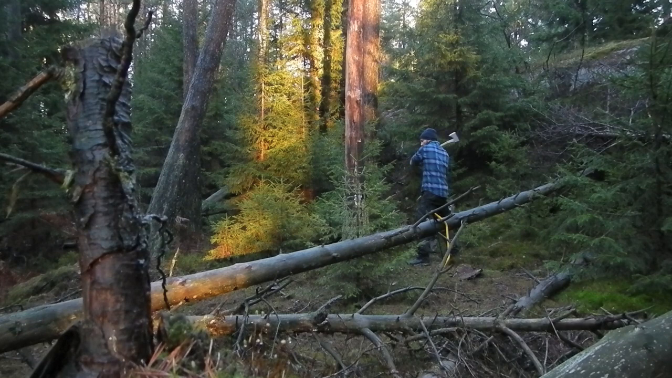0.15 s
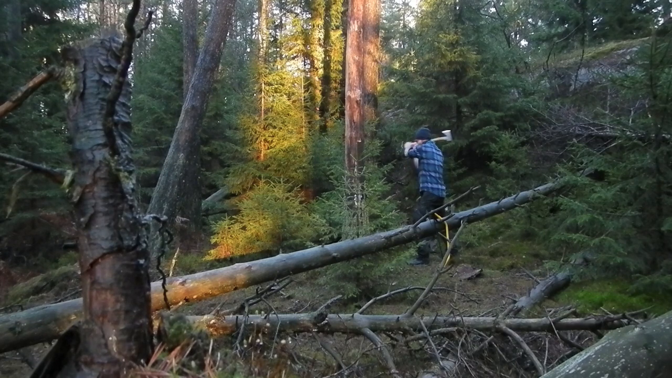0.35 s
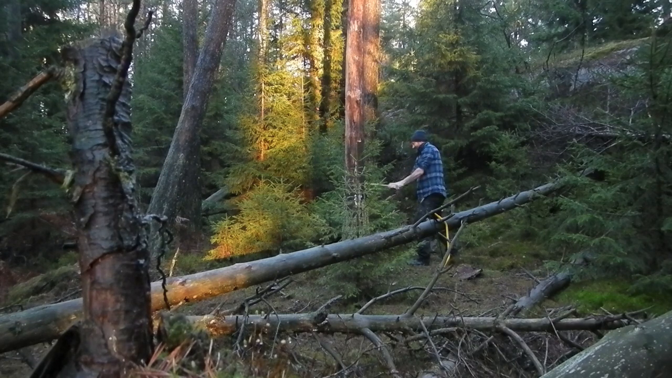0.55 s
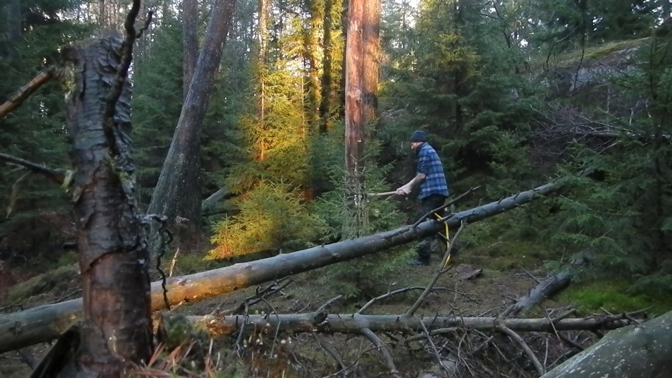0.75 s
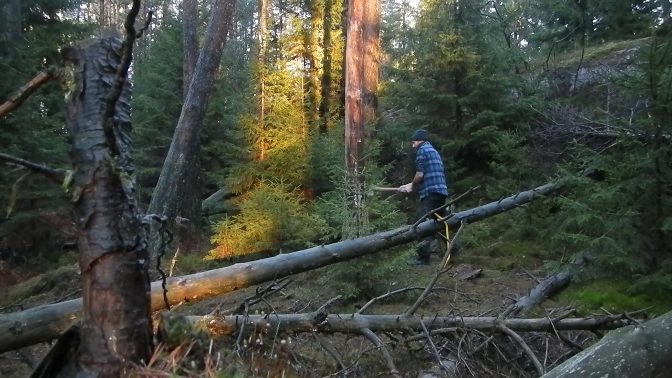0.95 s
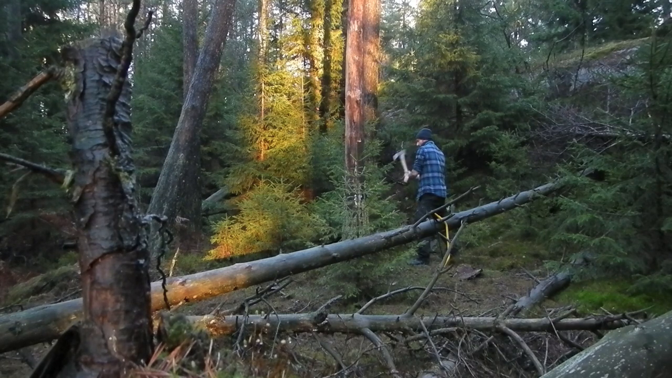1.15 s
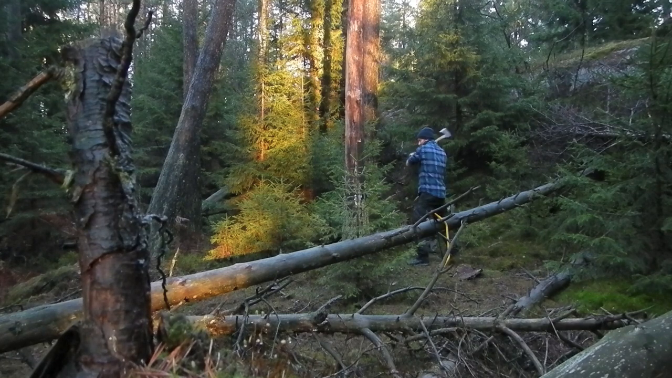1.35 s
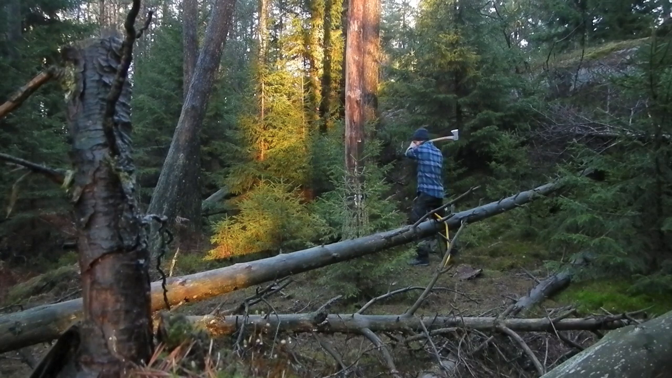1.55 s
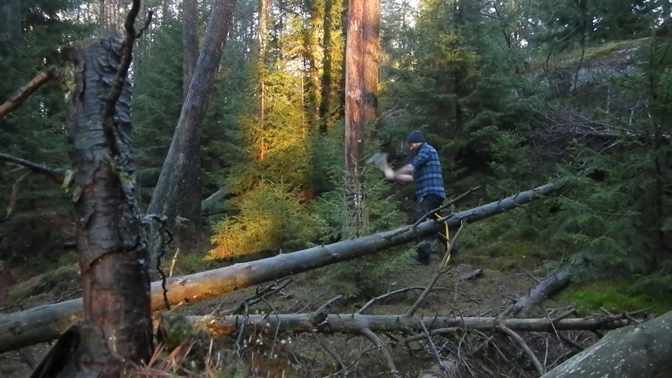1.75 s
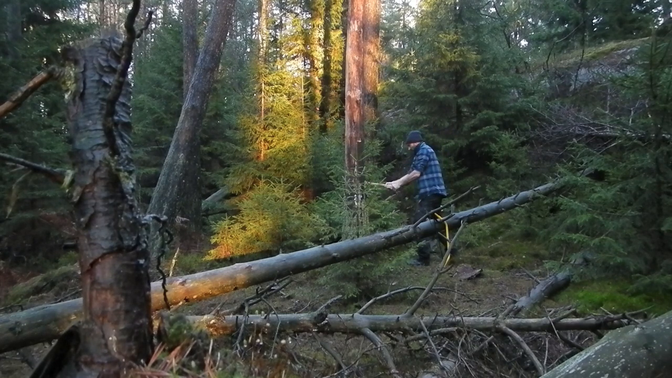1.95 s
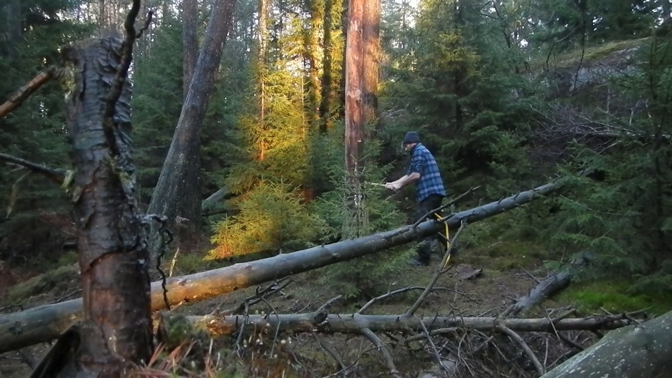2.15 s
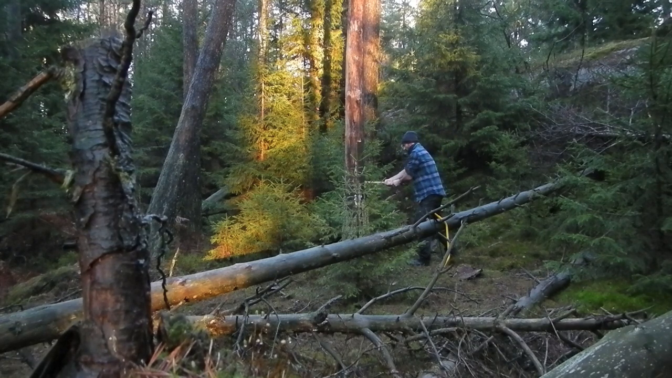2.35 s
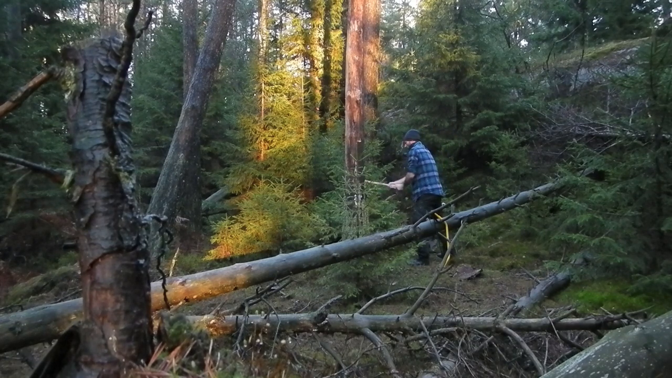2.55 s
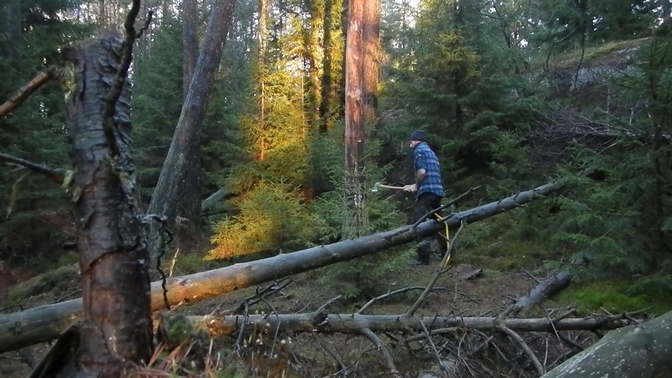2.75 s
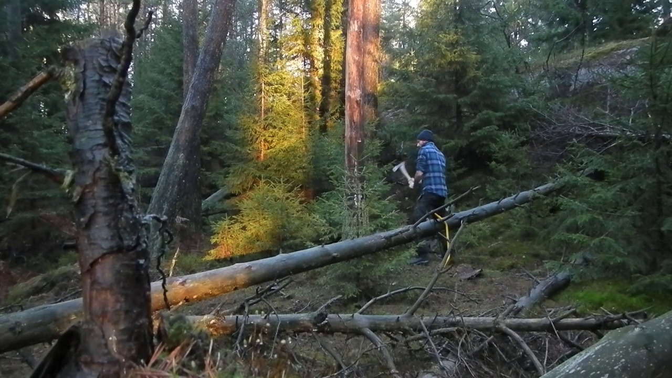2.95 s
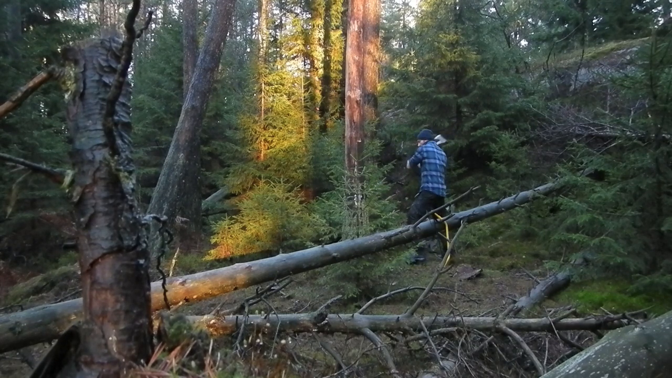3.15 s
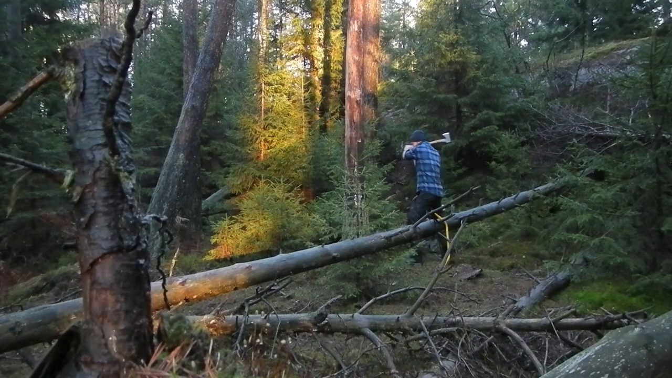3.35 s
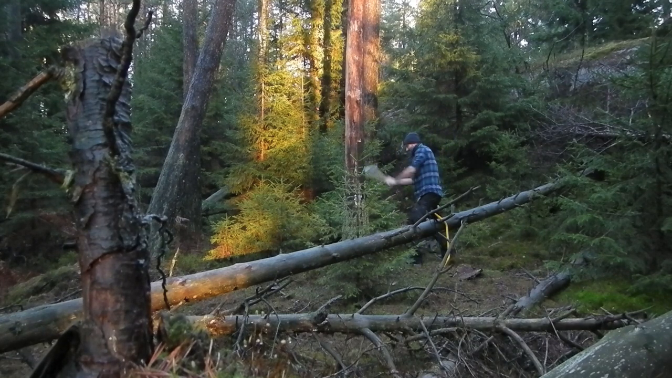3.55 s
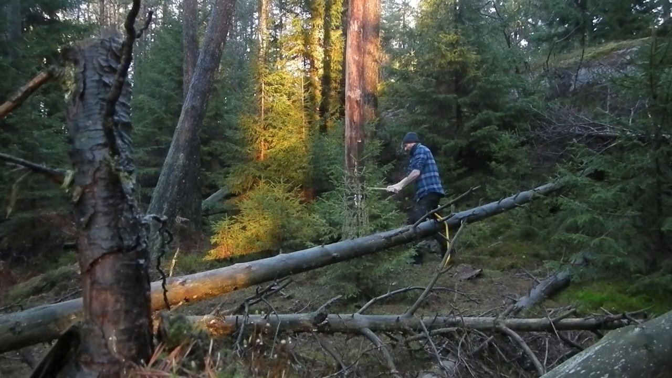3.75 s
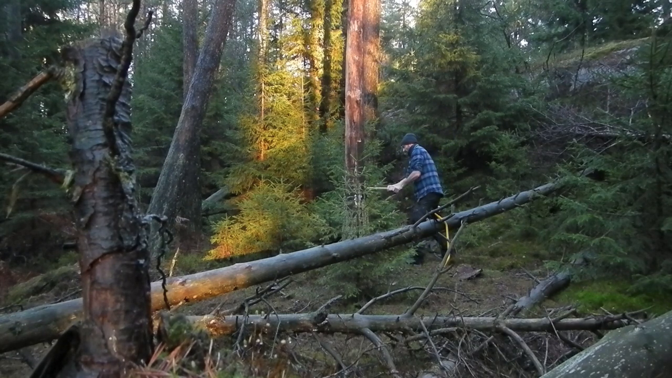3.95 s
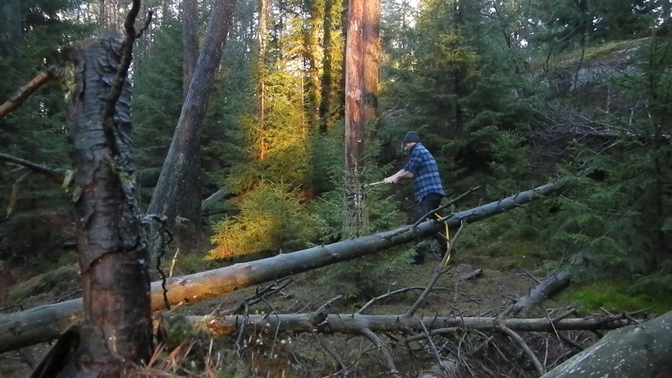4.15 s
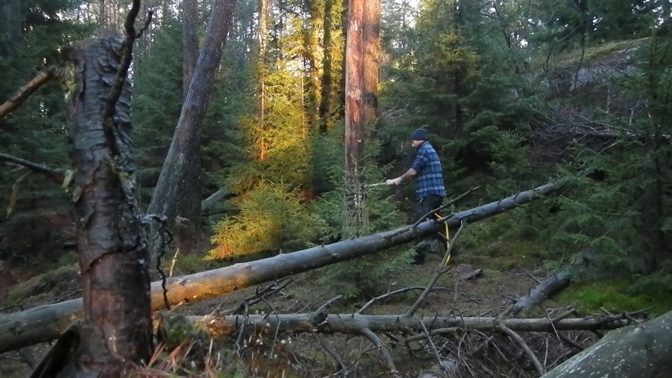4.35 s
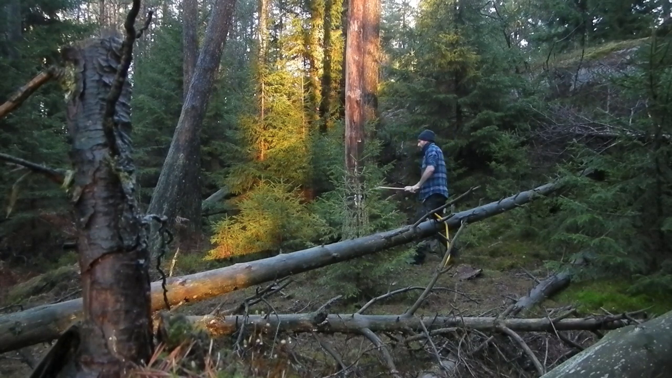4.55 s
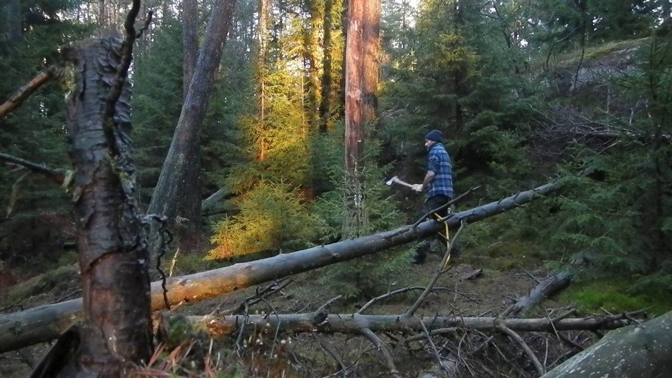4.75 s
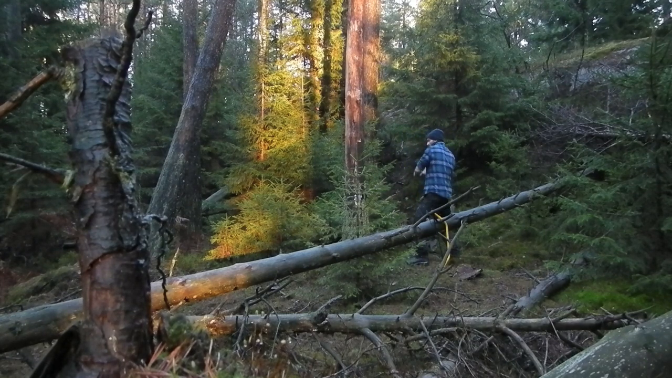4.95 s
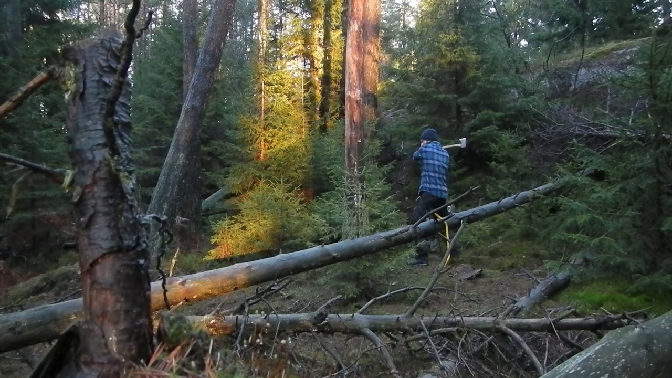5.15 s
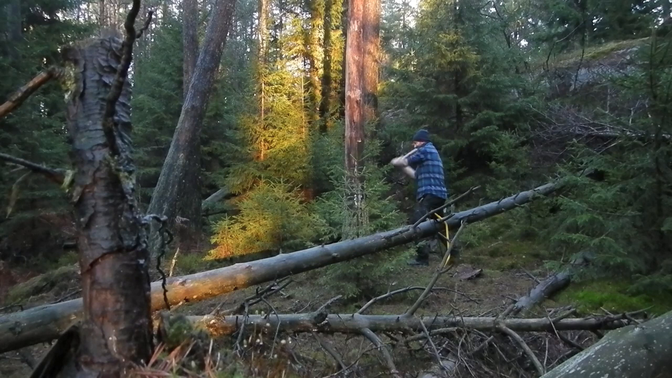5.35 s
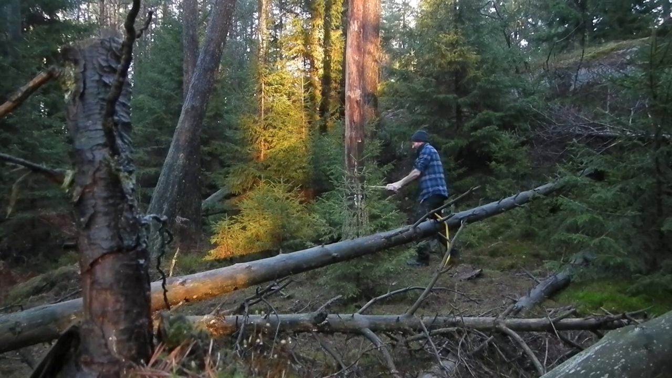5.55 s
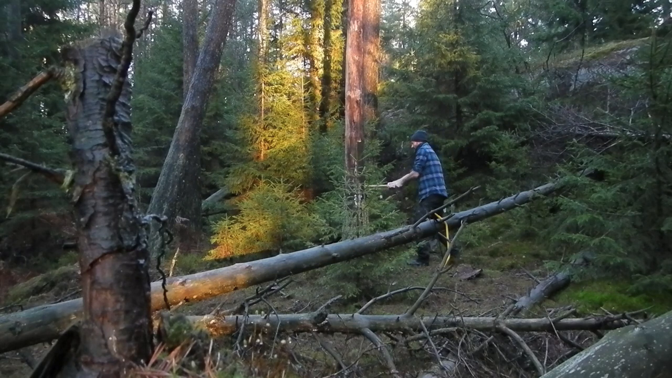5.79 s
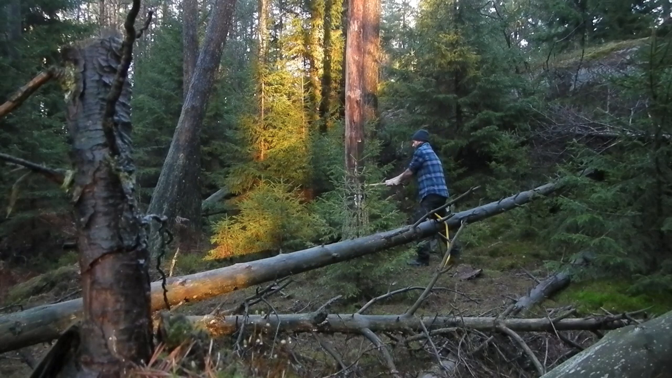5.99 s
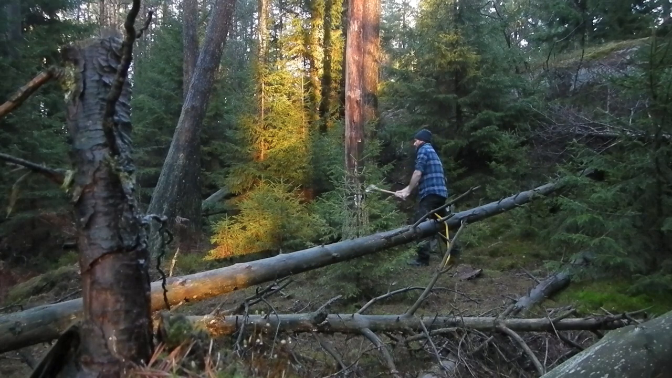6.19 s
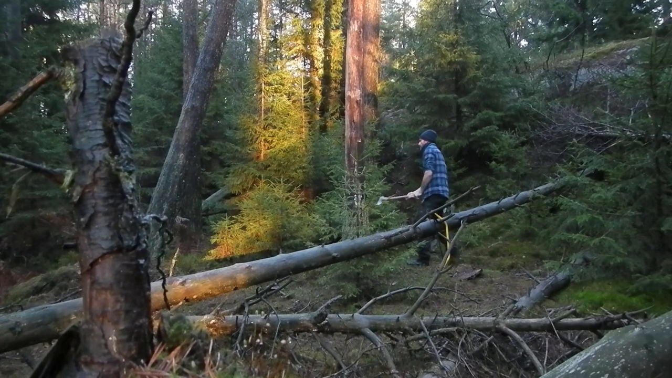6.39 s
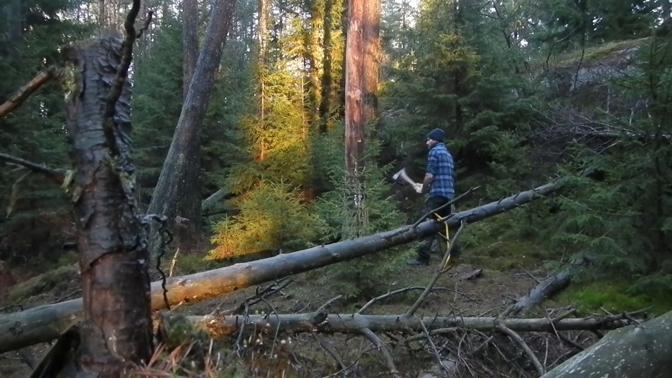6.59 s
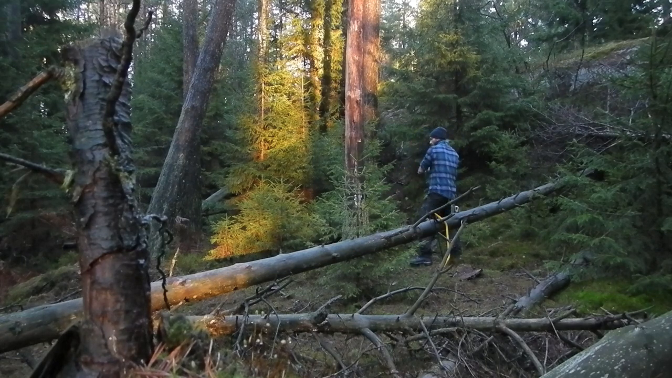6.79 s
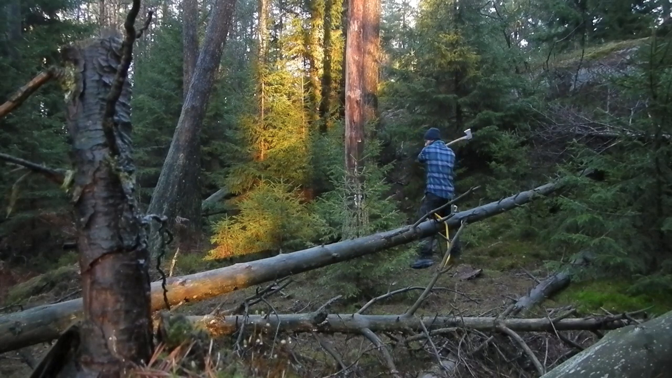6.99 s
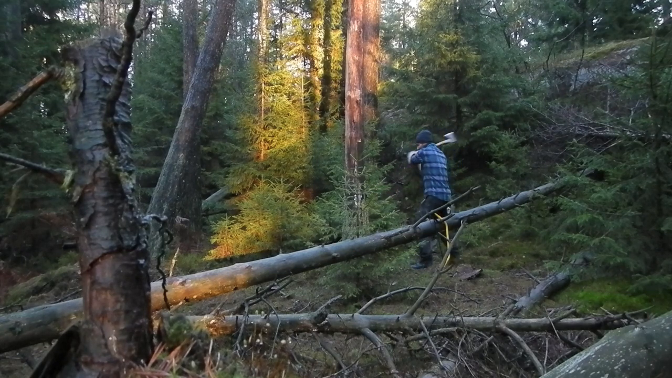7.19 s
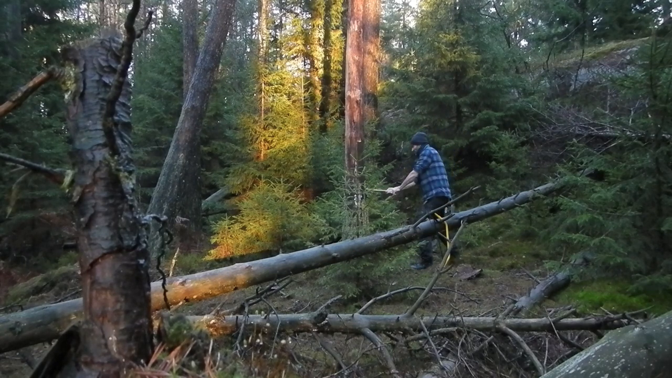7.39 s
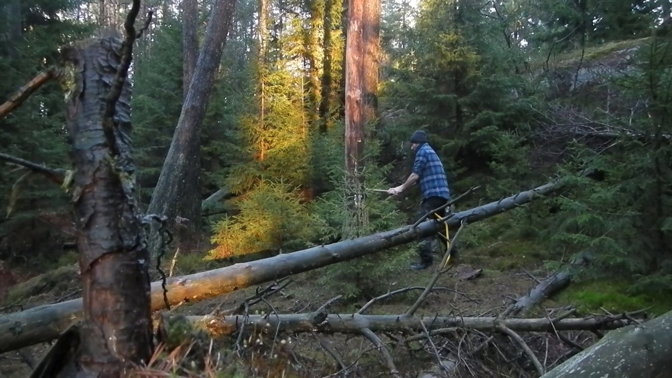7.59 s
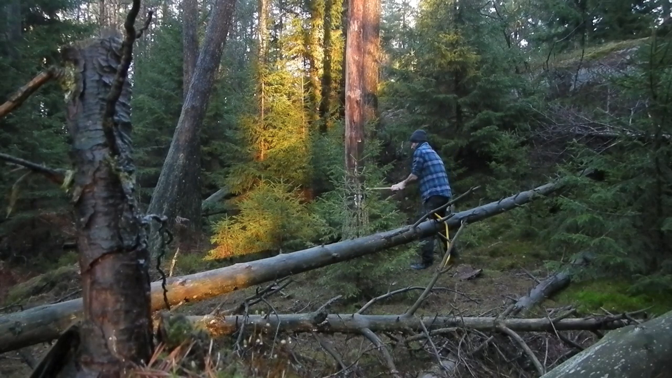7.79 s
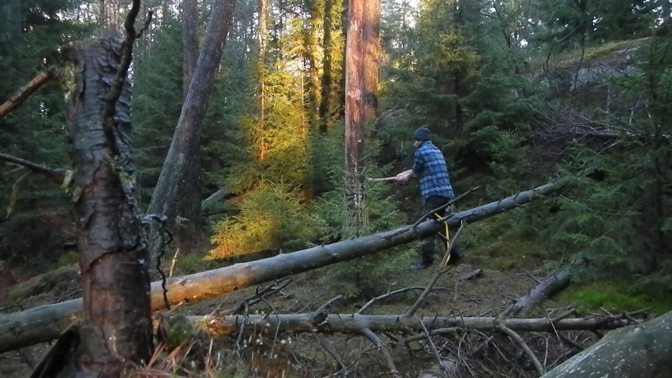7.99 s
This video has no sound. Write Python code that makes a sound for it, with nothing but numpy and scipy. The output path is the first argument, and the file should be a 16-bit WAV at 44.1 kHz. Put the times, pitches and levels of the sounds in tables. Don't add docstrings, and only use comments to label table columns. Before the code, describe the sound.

Five sharp, woody axe blows into a dry standing trunk in an echoing forest, with ticking chips, faint distant barks and soft camera hiss.

```python
import sys
import numpy as np
from scipy import signal
from scipy.fft import rfft, irfft, next_fast_len
from scipy.io import wavfile
from scipy.ndimage import uniform_filter1d, map_coordinates

SR = 44100
rng = np.random.default_rng(int(sys.argv[2]) if len(sys.argv) > 2 else 0)


def makeup_ratio(level_db):
    decades = np.asarray(level_db, float) / 20
    return 10 ** decades


def unload_wav(signal):
    wavfile.write(
        sys.argv[1],
        SR,
        np.round(np.clip(np.atleast_2d(signal).T, -1, 1) * 32767).astype(np.int16),
    )


N = 354123

# t/s, force over the usual/dB, extra treble/dB per octave, steel ring/dB, f of the notch/Hz
BLOWS = [
    (0.549, 2, 1, -38, 1626),
    (1.808, -1, 0, -40.5, 1740),
    (3.598, -1, -0.5, -42, 1450),
    (5.4703, 2.5, 0, -30, 1800),
    (7.349, -2, 0, -37, 1290),
]
# f/Hz, time to fall 60 dB/s
FOREST = [(100, 0.35), (500, 0.39), (1500, 0.28), (4000, 0.39), (10000, 0.43)]
# f/Hz, time to fall 60 dB/s
VALLEY = [(300, 0.69), (1000, 1), (4000, 0.88)]


def unit(x):
    return x / np.sqrt(np.mean(x ** 2) + 1e-20)


def along(points, hz):
    f, value = np.transpose(points)
    return np.interp(np.log(hz + 1), np.log(f + 1), value)


def filtered(x, response):
    n = x.shape[-1]
    m = next_fast_len(n + 8192)
    spectrum = rfft(x, m) * response(np.fft.rfftfreq(m, 1 / SR))
    return irfft(spectrum, m)[..., :n]


def resonant(peaks):
    def response(f):
        total = 0
        for k, (centre, width, db) in enumerate(peaks):
            damping = 1j * f * width
            total = total + (-1) ** k * makeup_ratio(db) * damping / (centre * centre - f * f + damping)
        return total
    return response


def add(track, s, sound):
    part = track[..., round(s * SR):][..., :sound.shape[-1]]
    part += sound[..., :part.shape[-1]]


def echoed(x, t60s):
    # f/Hz, likeness from 0 to 1
    alike = [(100, 0.94), (1500, 0.91), (4000, 0.35), (9000, 0.069)]
    hz, t, noise = signal.stft(rng.standard_normal((2, SR)), SR, nperseg=256)
    turn = np.arccos(np.clip(along(alike, hz), 0, 1))[:, None] / 2
    fading = makeup_ratio(-60 * t / along(t60s, hz)[:, None])
    lumps = makeup_ratio(2.5 * rng.standard_normal(len(t)))
    mid, side = noise * fading * [np.cos(turn), np.sin(turn)] * lumps
    tail = signal.istft(np.array([mid + side, mid - side]), SR, nperseg=256)[1]
    return signal.fftconvolve(x[None], tail / np.linalg.norm(tail[0]), axes=1)


def treble_tilt(bright_db):
    return lambda hz: makeup_ratio(bright_db * np.log2(1 + (hz / 3000) ** 2))


def edge_bite(t):
    stops = [(.0012, 0.000038, 0.98), (.0027, 0.0001, 0.089), (.0046, .0002, 0.55)]  # (s, bluntness s, size)
    return sum(size * np.exp(-((t - at) / blunt) ** 2) for at, blunt, size in stops)


def split_wood(t, bite, bright_db, notch_hz):
    # f/Hz, width/Hz, level/dB
    cut_modes = [(605, 320, -14.5), (969, 175, -1.5), (2940, 380, 1.5), (5100, 1000, -12)]
    # f/Hz, level/dB per Hz
    splinter = [(200, -21), (700, -5.5), (1800, 4), (3200, -12), (5000, -21.5), (7500, -33.5), (10500, -15),
                (16000, -32)]
    modes = sorted(cut_modes + [(notch_hz, 148, 3)])

    def small_cut(hz):
        ratio = hz / 420
        return (1j * ratio) ** 2 / (1 + 1.2j * ratio - ratio ** 2)

    entry = (1 - np.exp(-(t / 0.0013) ** 2)) * makeup_ratio(-60 * np.clip(t - .0035, 0, 1) / 0.011)
    fibres = entry * rng.standard_normal(len(t))
    wood = filtered(bite + 0.16 * fibres, lambda hz: resonant(modes)(hz) * small_cut(hz))
    tilt = treble_tilt(bright_db)
    crack = filtered(fibres * makeup_ratio(-60 * t / 0.0092), lambda hz: makeup_ratio(along(splinter, hz)) * tilt(hz))
    return wood / abs(wood).max() + makeup_ratio(-11.5) * crack / abs(crack).max()


def trunk_thump(t):
    # f/Hz, width/Hz, level/dB
    trunk_modes = [(100, 40, -3.5), (143, 55, 0.5), (202, 49, 2), (285, 73, -4), (506, 250, -10.5)]
    shake = (1 - np.exp(-t / 0.0031)) * makeup_ratio(-60 * t / 0.33) * rng.standard_normal(len(t))
    push = 0.52 * np.exp(-((t - .003) / 0.0013) ** 2)
    thump = filtered(shake + push, lambda hz: resonant(trunk_modes)(hz) / (1 + (hz / 700) ** 4))
    return makeup_ratio(-19.5) * thump / abs(thump).max()


def axe_head(t, bite, ring_db):
    # f/Hz, width/Hz, level/dB, time to fall 60 dB/s
    steel = [(990, 95, 0, 1.3), (955, 40, 11, .07), (1480, 50, -7, .4)]
    knock = filtered(bite, resonant([(954, 35, 0)]))
    knock_db = -11.5 + 0.54 * (ring_db + 38)
    sound = makeup_ratio(knock_db) * knock / abs(knock).max()
    for hz, width_hz, level_db, t60 in steel:
        ring = unit(filtered(rng.standard_normal(len(t)), lambda f: np.exp(-((f - hz) / width_hz) ** 2)))
        sound += makeup_ratio(ring_db + level_db - 60 * t / t60) * ring * (1 - np.exp(-t / 0.0011))
    return sound


def trees_answer(bright_db):
    # f/Hz, level/dB per Hz
    around = [(25, -6), (100, -2), (250, -6), (400, -9.5), (1300, -2.5), (2800, -11.5), (7000, -24),
              (15000, -29)]
    tilt = treble_tilt(bright_db)
    pulse = 1. * (np.arange(SR // 20) == SR // 200)
    click = filtered(pulse, lambda hz: makeup_ratio(along(around, hz)) * tilt(hz))
    click *= 1.84 / np.linalg.norm(click)
    return echoed(click, FOREST) + makeup_ratio(-8.5) * echoed(click, VALLEY)


def chop():
    out, t = np.zeros((2, N)), np.arange(SR) / SR
    peak_db, sides = -0.34, makeup_ratio([[1], [-1]])
    bite = edge_bite(t)
    for s, _, bright_db, ring_db, notch_hz in BLOWS:
        blow = split_wood(t, bite, bright_db, notch_hz) + trunk_thump(t) + axe_head(t, bite, ring_db)
        add(out, s, makeup_ratio(peak_db) * blow * sides)
        add(out, s + 0.00096, makeup_ratio(-27) * echoed(blow[:SR // 20], FOREST))
        add(out, s - .002, makeup_ratio(peak_db + 6.5) * trees_answer(bright_db) * sides)
    return out


def chips():
    # t/s, peak level/dB, middle f/Hz, spread/octaves
    landings = [(0.6397, -18.5, 4000, 1.2), (0.662, -20.5, 2580, 0.44), (.666, -24, 2880, 0.37),
                (0.672, -26, 1190, 0.85), (.9219, -40, 10000, .6), (.939, -42, 9000, .6),
                (1.065, -46, 11500, .3), (2.0843, -43, 10100, .3), (2.229, -45, 3500, 1.2),
                (2.2364, -38.5, 5500, 1.1), (2.2514, -41, 5000, .6), (2.2663, -29.5, 1700, 1.7),
                (2.289, -43, 3000, .65), (2.341, -48, 11000, .4), (4.0194, -41, 6000, 1),
                (4.047, -40, 4930, .8), (4.388, -45, 5500, .8), (4.905, -41.5, 6000, .6),
                (5.716, -38.5, 3970, 1.5), (5.768, -37, 6000, 1.2), (7.703, -42, 3200, .4)]
    out, t = np.zeros((2, N)), np.arange(-.002, .05, 1 / SR)
    for s, db, hz, octaves in landings:
        tap = (t > 0) * makeup_ratio(-60 * t / 0.011) * rng.standard_normal(len(t))
        tick = filtered(tap, lambda f: np.exp(-(np.log2(f / hz + 1e-9) / octaves) ** 2))
        tick = makeup_ratio(db + 2.5) * tick / abs(tick).max()
        add(out, s + t[0], tick * makeup_ratio([[.6], [-.6]]))
        add(out, s + .003, makeup_ratio(-9) * echoed(tick, FOREST))
    return out


def squeak():
    # t/s, slips per second/Hz
    slip_rate = [
        (7.762, 985),
        (7.79, 1075),
        (7.803, 990),
        (7.815, 1130),
        (7.823, 885),
        (7.831, 1020),
        (7.839, 885),
        (7.86, 930),
        (7.87, 1040),
    ]
    # f/Hz, width/Hz, level/dB
    groove = [(600, 1300, -8.5), (1470, 270, 4), (2020, 770, 0.5), (3230, 590, 1), (5500, 460, -4)]
    out, start = np.zeros((2, N)), slip_rate[0][0]
    t = np.arange(start, start + .2, 1 / SR)
    past = lambda at: 1 / (1 + np.exp((at - t) / 0.0045))

    grip_db = -27.5 - 8 * past(7.838) - 1250 * np.clip(t - 7.868, 0, None)
    drag = makeup_ratio(grip_db) * (1 - np.exp(-(t - start) / .002))
    judder = unit(filtered(rng.standard_normal((2, len(t))), lambda f: f < 260))
    turns = np.cumsum(np.interp(t, *np.transpose(slip_rate)) * (1 + .012 * judder[0])) / SR
    orders = np.arange(1, 15)[:, None]
    weak = np.where(orders % 2, .8 - 0.79 * past(7.798), 1)
    slips = unit((weak * np.cos(np.pi * orders * turns + .3 * orders ** 2)).sum(0))
    slips = (slips + .5 * rng.standard_normal(len(t))) * makeup_ratio(1.5 * judder[1])
    rub = drag * slips

    sound = makeup_ratio(3.5) * filtered(rub, lambda f: resonant(groove)(f) / (1 + (f / 3800) ** 8) ** 0.42)
    muffled_db = 15.5 * (past(7.787) - past(7.855))
    sound += makeup_ratio(-muffled_db) * filtered(rub, resonant([(983, 52, 13)]))
    scrape = drag * rng.standard_normal(len(t))
    sound += makeup_ratio(-18) * filtered(scrape, resonant([(8000, 10000, 0)]))
    jerk = makeup_ratio(-9 - 60 * (t - start) / 0.0075) * (rng.standard_normal(len(t)) + 6 * (t == start))
    sound += filtered(jerk, lambda f: resonant([(1700, 1800, 0)])(f) * resonant([(2200, 2400, 0)])(f) ** 2)
    add(out, start, sound * makeup_ratio([[1.2], [-1.2]]))
    add(out, start + .005, makeup_ratio(-12) * echoed(sound, FOREST) + makeup_ratio(-14.5) * echoed(sound, VALLEY))
    return out


def dog():
    # t/s, held f/Hz, share by which it starts flat, length/s, level/dB
    barks = [(1.553, 575, .24, .09, -46.5), (1.606, 690, .03, 0.055, -50.5), (1.647, 785, .02, .04, -58),
             (1.923, 686, .05, .07, -46.5), (3.176, 563.3, .08, 0.065, -45.5),
             (3.237, 740, .07, .06, -51.5), (3.468, 478, .04, .032, -57), (3.493, 815, .07, .04, -52),
             (3.511, 665, .04, 0.036, -46.5), (3.51, 556, .04, 0.03, -52), (7.932, 640, .03, 0.021, -51)]
    out = np.zeros((2, N))
    for s, hz, flat, length, db in barks:
        u = np.arange(0, 1, 1 / (length * SR))
        pitch = hz * (1 - flat * np.exp(-u * length / .02))
        hoarse = 1 + .4 * unit(uniform_filter1d(rng.standard_normal(len(u)), size=300))
        swell = np.sin(np.pi * u ** 1.22) ** 1.02
        tone = makeup_ratio(db + 5.5) * hoarse * swell * np.sin(2 * np.pi * np.cumsum(pitch) / SR)
        add(out, s, tone * makeup_ratio([[.5], [-.5]]))
        add(out, s + 0.023, makeup_ratio(-5.5) * echoed(tone, VALLEY))
    return out


def camera():
    # f/Hz, width/Hz, left level/dB, right level/dB
    shell_bands = [(1009, 183, -67.5, -56), (1277, 280, -67, -57), (2200, 612, -47.5, -50.5),
                   (3200, 690, -63, -96.5), (4145, 930, -89, -57), (7190, 990, -62.5, -66.5),
                   (8400, 1100, -68, -76), (11500, 1040, -79.5, -70)]
    # f/Hz, left level/dB per Hz, right level/dB per Hz
    hiss_curve = np.array([(25, -11, -6), (70, 0.5, -0.5), (410, -4.5, -6.5), (2440, -10.5, -11),
                           (5500, -17, -13), (11000, -22, -21), (13500, -24.5, -22), (16000, -36, -40)])

    def shell(hz):
        power = 0
        for centre, width, left_db, right_db in shell_bands:
            band = 1 / np.sqrt(width * (1 + ((hz - centre) / (width / 2)) ** 6) / (SR / 2))
            power = power + (makeup_ratio([[left_db], [right_db]]) * band) ** 2
        return np.sqrt(power)

    def colour(hz):
        return makeup_ratio([along(hiss_curve[:, [0, 1]], hz), along(hiss_curve[:, [0, 2]], hz)])

    knots = rng.standard_normal(int(N * 40 / SR) + 4)
    flutter = makeup_ratio(map_coordinates(knots, [np.arange(N) * 40 / SR]))
    motor = filtered(flutter * rng.standard_normal(N), shell)
    hiss = makeup_ratio(-51) * unit(filtered(rng.standard_normal((2, N)), colour))
    whine = makeup_ratio([[-61], [-60]]) * np.sqrt(2) * np.sin(2 * np.pi * 14835 * np.arange(N) / SR)
    return filtered(motor + hiss, lambda hz: 1 / (1 + (hz / 14000) ** 30)) + whine


def scene():
    return chop() + chips() + squeak() + dog() + camera()


def low_pass(x):
    return signal.sosfilt(signal.butter(12, 16460, fs=SR, output="sos"), x)


def record(dry):
    t, duck_db, gate_db = np.arange(N) / SR, np.zeros(N), np.zeros(N)
    for s, force_db, *_ in BLOWS:
        after = np.clip(t - s - .004, 0, None)
        drop_db = 14 + force_db - 2.5
        back_db = 1.394 * np.logaddexp(0, (drop_db - 18 * after) / 1.346)
        duck_db = np.maximum(duck_db, back_db * (1 - np.exp(-after / 0.0073)))
        gate_db = np.maximum(gate_db, 0.67 * back_db * (1 - np.exp(-(after / 0.17) ** 2)))
    treble = filtered(dry, lambda hz: np.exp(-((hz - 10500) / 3600) ** 4))
    x = (dry - treble * (1 - makeup_ratio(-gate_db))) * makeup_ratio(-duck_db)
    x = x / (1 + abs(x / .95) ** 4) ** (1 / 4)
    x = filtered(x, lambda hz: 1 / (1 + (hz / 15700) ** 60))
    return low_pass(x)


dry = scene()
out = record(dry)
unload_wav(out)
```